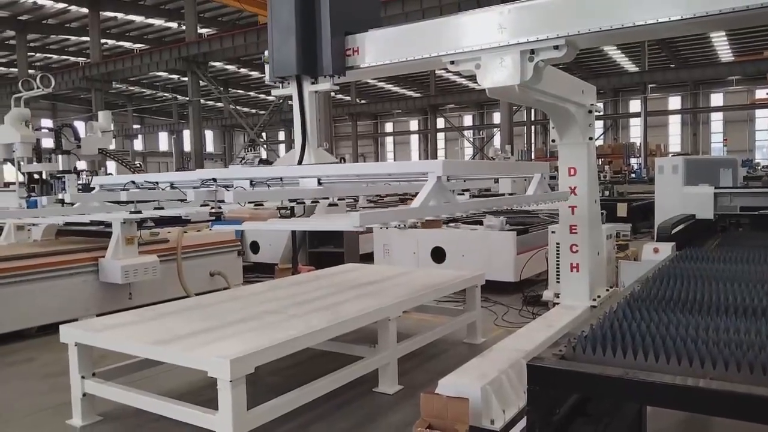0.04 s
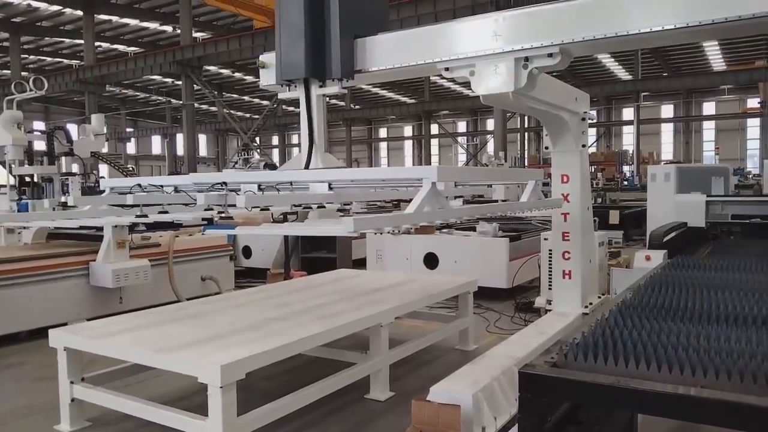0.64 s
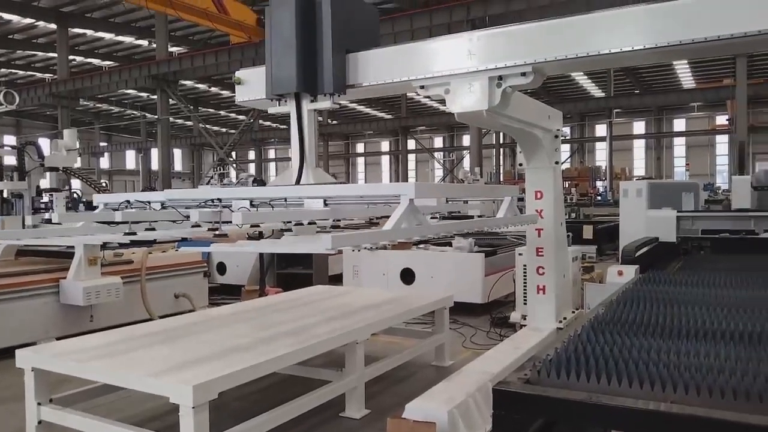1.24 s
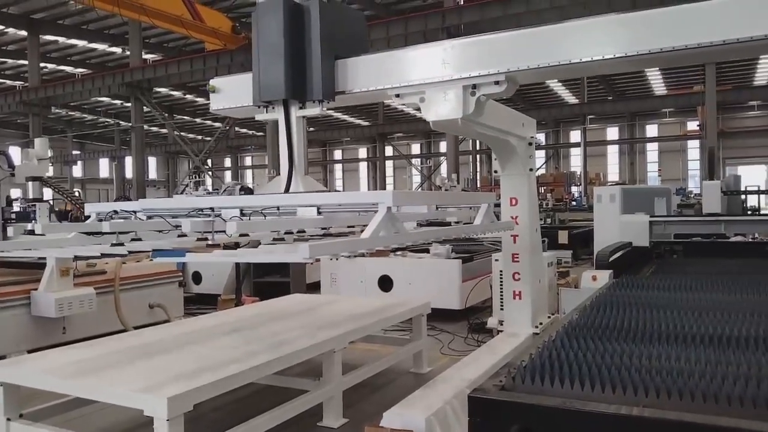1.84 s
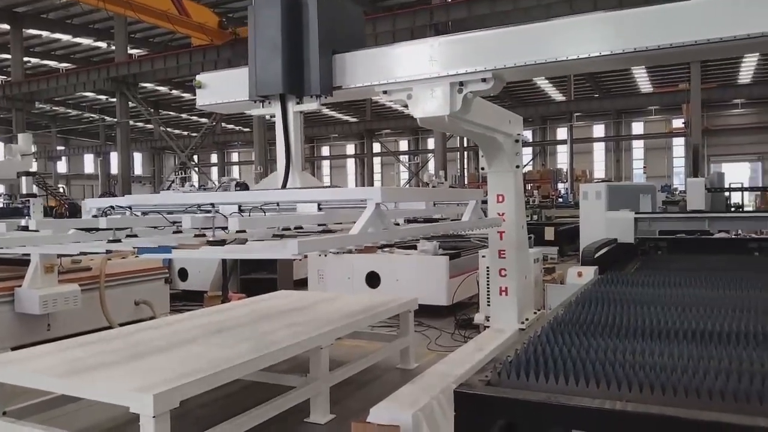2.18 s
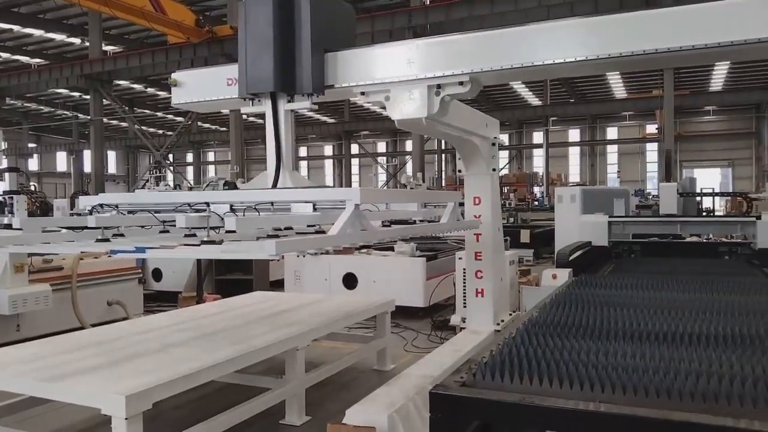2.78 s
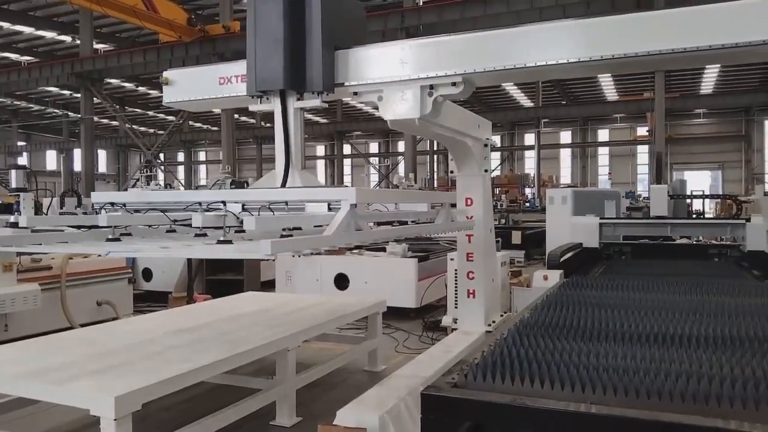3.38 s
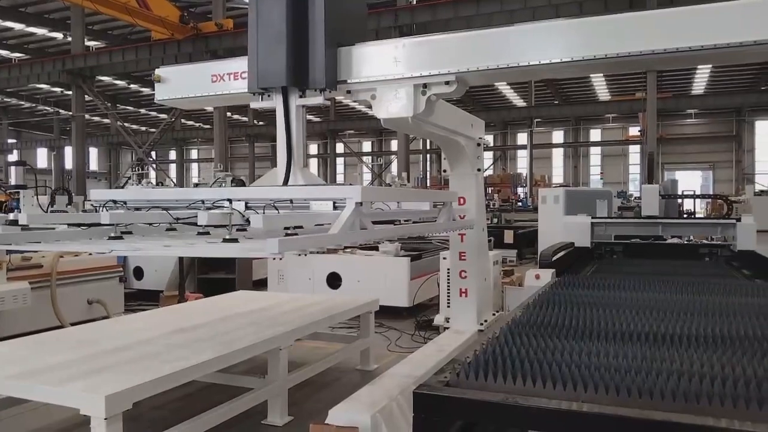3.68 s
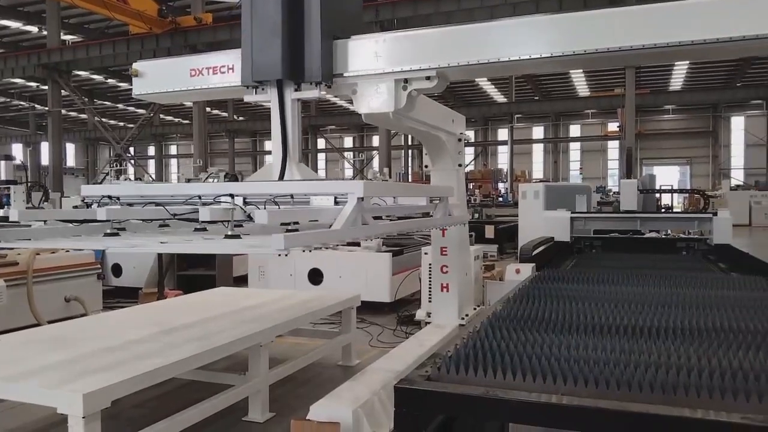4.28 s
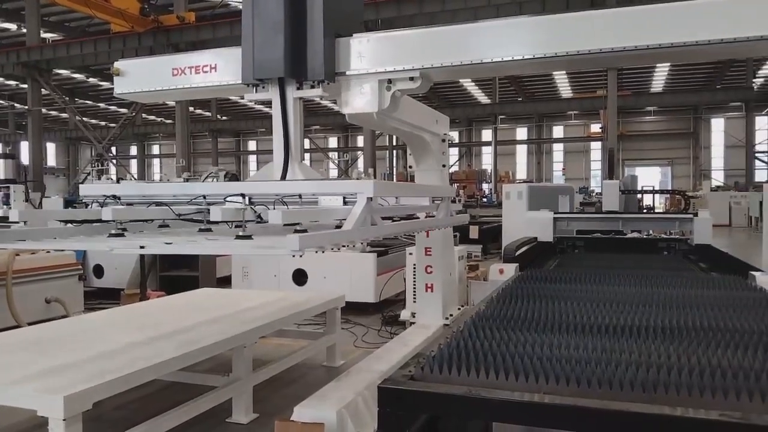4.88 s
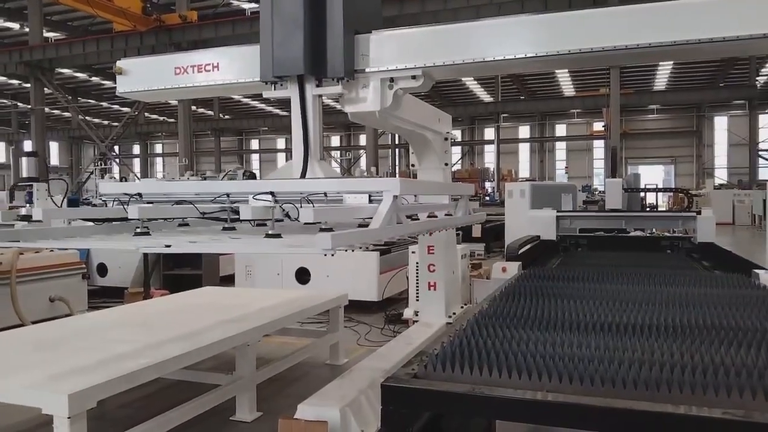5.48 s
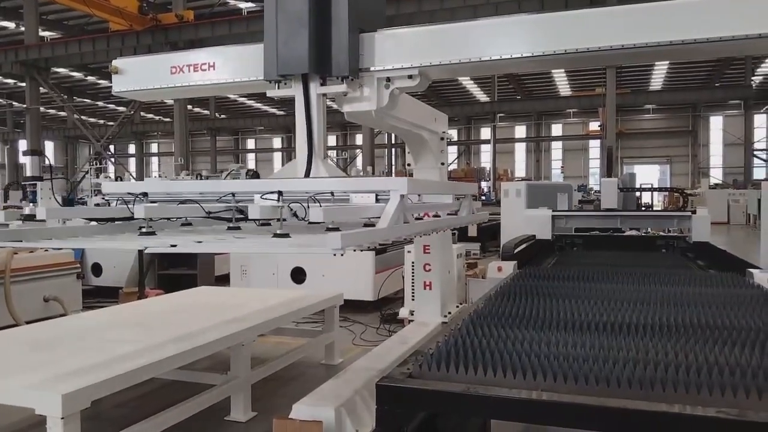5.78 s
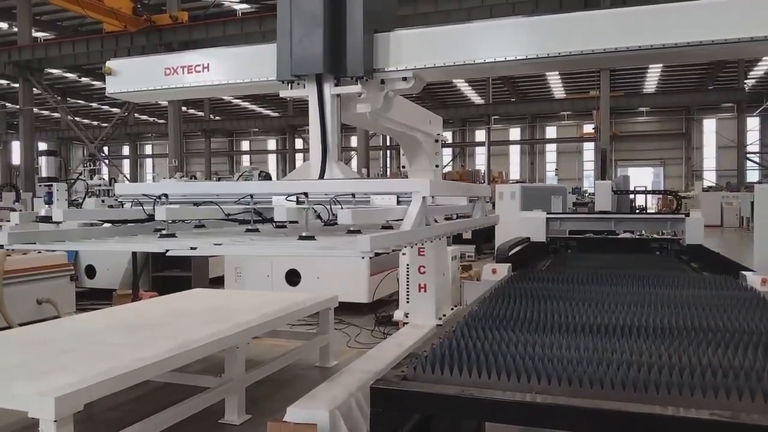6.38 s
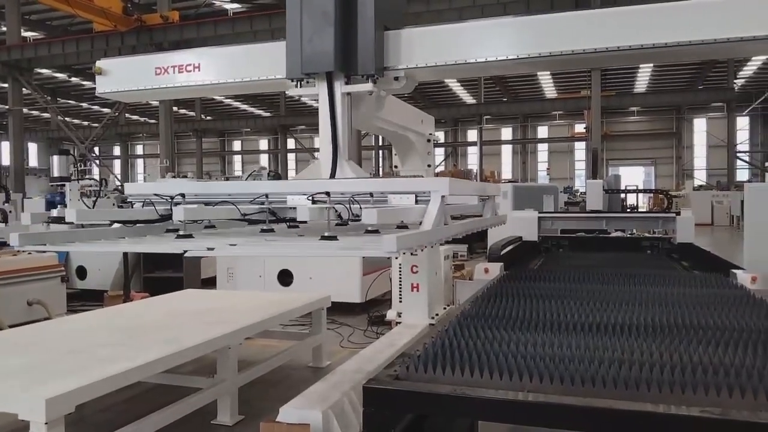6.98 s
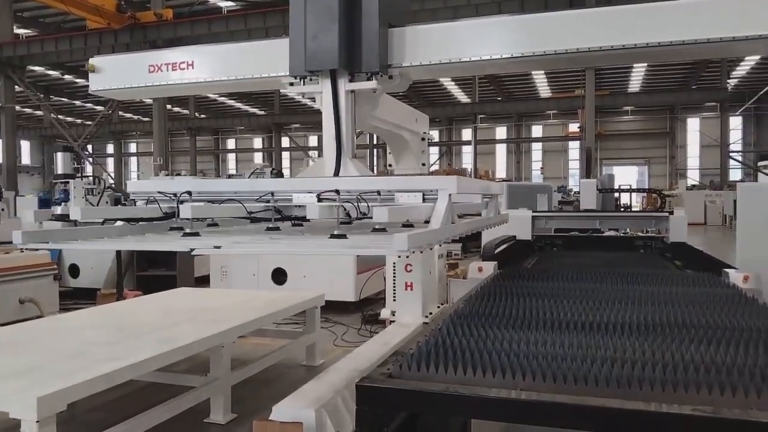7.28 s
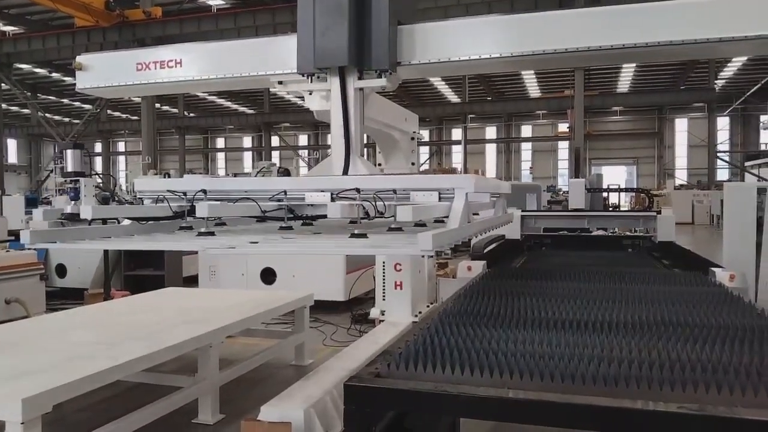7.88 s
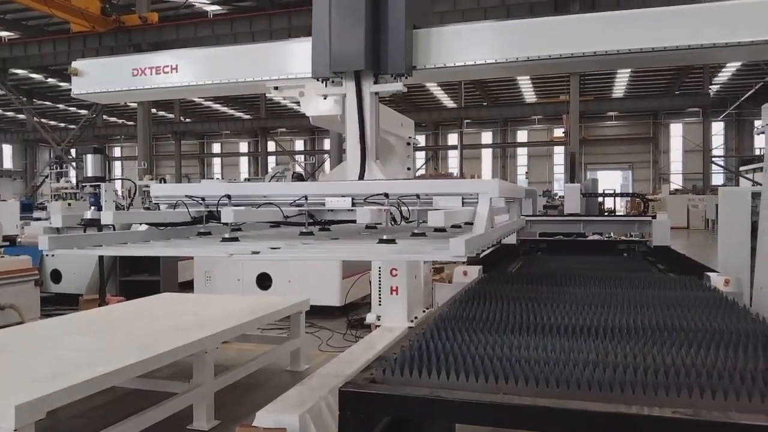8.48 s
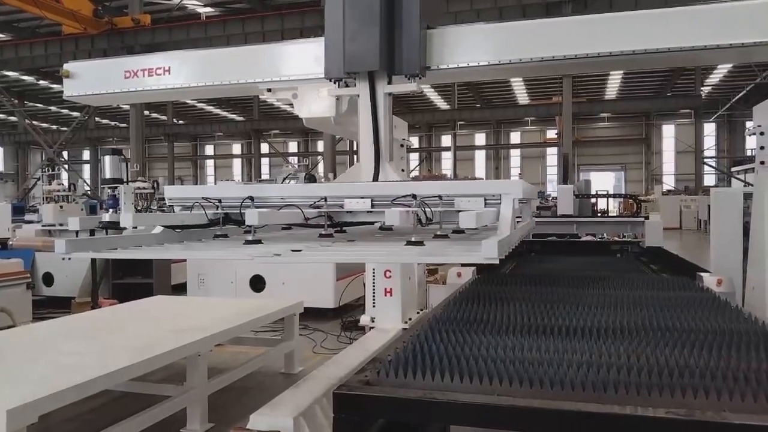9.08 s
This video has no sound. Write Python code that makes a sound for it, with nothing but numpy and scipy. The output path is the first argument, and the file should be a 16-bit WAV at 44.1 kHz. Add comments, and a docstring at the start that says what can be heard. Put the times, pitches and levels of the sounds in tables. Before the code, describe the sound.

A motor whine swells and fades at one pitch in a factory, joined by rasping guides, a sharp metallic bang and air hiss.

```python
"""The drive of a gantry loader whines on the harmonics of one pitch as it crosses a factory hall.
Moving at steady speed through the hall's standing waves, it swells and fades on each harmonic in turn.
Its gears beat and throb, its guides rasp and squeak; below lie mains hum, a pump and far machines.
One loud impact and a few faint ticks ring the metal frame and reverberate in the hall.
A small leak hisses throughout; later, turbulent air rushes through suction cups in spurts."""
import sys
import numpy as np
from scipy import signal
from scipy.fft import rfft, irfft, next_fast_len
from scipy.io import wavfile

SR = 44100
rng = np.random.default_rng(int(sys.argv[2]) if len(sys.argv) > 2 else 0)


def to_wav(sig):
    """Store sig (one row per channel, or 1-D mono) as 16-bit WAV at the path in sys.argv[1].

    Samples outside -1..1 are clipped; the rate is SR.
    """
    pcm = np.clip(np.atleast_2d(sig), -1, 1) * 32767
    pcm = np.round(pcm).astype(np.int16)
    wavfile.write(sys.argv[1], SR, pcm.T)  # frames by channels


N = 403054
T = np.arange(N) / SR


def amp(db):
    """Decibels to amplitude ratio."""
    return 10 ** (np.asarray(db) / 20)


def unit(x):
    """Normalisation to rms 1."""
    return x / np.sqrt(np.mean(abs(x) ** 2) + 1e-20)


def curve(points):
    """Linear interpolation of (time [s], value) at every sample."""
    return np.interp(T, *np.transpose(points))


def read(points, hz):
    """Interpolation of (frequency [Hz], value) on a log-frequency axis."""
    f, value = np.transpose(points)
    return np.interp(np.log(hz + 1), np.log(f + 1), value)


def noise(spectrum):
    """Spectral shaping: white noise filtered to a relative spectrum, at an rms near 1."""
    size = next_fast_len(N + 4096)
    gain = unit(amp(read(spectrum, np.fft.rfftfreq(size, 1 / SR))))
    return irfft(rfft(rng.standard_normal(N), size) * gain, size)[:N]


def drift(cutoff_hz):
    """Random modulation: low-passed noise with an rms near 1."""
    size, rate = 8192, 600
    f = np.fft.rfftfreq(size, 1 / rate)
    slow = irfft(rfft(rng.standard_normal(size)) * (f > 0) / np.sqrt(1 + (f / cutoff_hz) ** 8))
    return np.interp(T, np.arange(size) / rate, unit(slow))


def tone(hz, scatter, waver_hz):
    """Multipath fading: a sine wavers as the share `scatter` of its power comes by shifting reflections."""
    phase = 2 * np.pi * (hz * T + rng.random())
    share = np.clip(scatter, 0, 1)
    steady, scattered = np.sqrt(2 * (1 - share)), np.sqrt(share)
    in_phase = steady + scattered * drift(waver_hz)
    quadrature = scattered * drift(waver_hz)
    return in_phase * np.cos(phase) + quadrature * np.sin(phase)


# passages from node to node: (harmonic number, start [s], end [s], crest level [dB])
NODE_PASSAGES = [(2, -.5, .8, -42.5), (2, .62, 2.13, -47), (2, 2.12, 3.3, -49), (2, 2.35, 4.02, -41.8),
                 (2, 3.92, 6.7, -38), (2, 5.4, 6.68, -45), (2, 6.67, 8.85, -42.2), (2, 8.6, 9.7, -55),
                 (3, -.6, 1.65, -56), (3, 1.55, 3.25, -55.5), (3, 3.3, 6.5, -56), (3, 6.3, 8, -62),
                 (3, 8.1, 9.6, -63), (4, -.17, .47, -46), (4, .15, 1.8, -40.3), (4, 1.8, 2.35, -46.5),
                 (4, 2.1, 3.6, -37.5), (4, 3.1, 5.72, -35.7), (4, 3.55, 5, -35), (4, 5.7, 6.8, -38.7),
                 (4, 6.1, 8.14, -36.4), (4, 8.19, 10, -41.5), (5, .25, 2.1, -57), (5, 2.15, 3.3, -56),
                 (5, 3.33, 4.3, -50.5), (5, 4.3, 5.6, -48.5), (5, 5.7, 6.9, -52), (5, 7.95, 8.7, -52),
                 (5, 8.65, 9.3, -53), (6, -.3, .56, -37.5), (6, .56, 1.2, -45), (6, 1.05, 1.9, -44),
                 (6, 1.85, 2.9, -40), (6, 2.7, 3.65, -40.5), (6, 3.6, 4.44, -44), (6, 4.45, 5.55, -37.7),
                 (6, 5.53, 6.5, -37.3), (6, 6.5, 7.52, -43), (6, 7.48, 8.6, -39.2), (6, 8.52, 8.95, -47),
                 (6, 8.99, 9.6, -46), (7, -.2, .7, -52.5), (7, .9, 2.1, -52.5), (7, 2.1, 3.1, -60),
                 (7, 5.15, 6.1, -53.5), (7, 6.7, 7.5, -58), (7, 7.5, 8.45, -58), (8, -.1, .77, -54.5),
                 (8, .8, 2, -63), (8, 2, 3.45, -55), (8, 3.45, 4.6, -56.5), (8, 4.58, 5.15, -59),
                 (8, 5.1, 5.84, -52), (8, 5.84, 6.52, -50.7), (8, 6.68, 7.45, -55), (8, 7.9, 8.95, -55),
                 (10, -.1, 1.3, -72), (10, 2.42, 3.4, -65.5), (10, 4.1, 5, -69), (10, 5, 6.4, -74),
                 (12, .45, 1.1, -77), (12, 1.1, 1.9, -80), (12, 1.95, 3.25, -78.5), (12, 3.3, 3.85, -75),
                 (12, 3.85, 4.5, -78), (12, 5.15, 5.8, -81)]

def swells(harmonic, arch_power=0.93):
    """Standing waves: a harmonic's amplitude arches between nodes; overlapping arches add in power."""
    power = np.zeros(N)
    for k, start, end, db in NODE_PASSAGES:
        if round(k) == harmonic:
            inside = (T > start) & (T < end)
            arch = abs(np.sin(np.pi * (T[inside] - start) / (end - start))) ** arch_power
            power[inside] += (amp(db) * arch) ** 2
    return np.sqrt(power)


# scattered part of each overtone: (harmonic number, level at closest approach [dB])
DIFFUSE_FIELD = [(2, -69), (3, -67), (4, -61), (5, -62), (6, -57), (7, -64), (8, -68), (10, -80), (12, -93)]
DRIVE_HZ, FUNDAMENTAL_DB = 396.02, -50.5
NEAREST_S, PASS_S = 4.15, 2.74  # closest approach; time to travel a length equal to that distance

def whine():
    """Spherical spreading: the fundamental follows 1/distance; overtones swell over a diffuse field."""
    nearness = 1 / np.hypot(1, (T - NEAREST_S) / PASS_S)
    out = amp(FUNDAMENTAL_DB) * nearness * tone(DRIVE_HZ, scatter=0.016, waver_hz=2.3)
    for harmonic, db in DIFFUSE_FIELD:
        k = round(harmonic)
        diffuse = amp(db + drift(k / 2)) * nearness ** 0.3
        overtone = tone(k * DRIVE_HZ, scatter=0.00064 * k ** 2.13, waver_hz=18.8)
        out += np.hypot(swells(k), diffuse) * overtone
    return out


def standing(crest_s, spacing_s, node_fill=0.25):
    """Amplitude of a partial standing wave crossed at steady speed, one node every spacing_s."""
    return np.hypot(np.cos(np.pi * (T - crest_s) / spacing_s), node_fill)


# mesh tones around harmonic 6: (frequency [Hz], relative crest level [dB], time of one crest [s])
SIDEBANDS = [(2290, -56.5, 0.52), (2330, -53, .05), (2345, -53, 0.24), (2350.5, -55, .35),
             (2345, -51, 0.37), (2341, -54, 0.68), (2384, -55.5, 0.15), (2380, -57, 0.63)]
# their common envelope: (time [s], gain [dB])
SIDEBAND_GAIN = [(0, 0), (.8, 3.5), (1.4, -0.5), (2.3, 0.5), (3.3, 1.5), (4.25, 2.5), (5, -0.5), (6.3, -2),
                 (7.2, -2.5), (8.4, -2), (9, 0)]
# faint gear overtones: (frequency [Hz], crest level [dB])
GEAR_OVERTONES = [(1423.9, -60.5), (1442.1, -67.5), (3564.3, -75), (4011.9, -85.5), (7128.3, -81.5),
                  (8000.3, -83.5)]
NODE_S = 1  # time from node to node at harmonic 6

def gear_mesh():
    """Beating: close sidebands interfere into a chatter; shorter wavelengths bring nodes more often."""
    sidebands = sum(amp(db) * standing(crest_s, NODE_S) * tone(hz, scatter=0.14, waver_hz=4)
                    for hz, db, crest_s in SIDEBANDS)
    out = amp(curve(SIDEBAND_GAIN)) * sidebands
    for hz, db in GEAR_OVERTONES:
        swell = standing(rng.random(), NODE_S * 6 * DRIVE_HZ / hz)
        out += amp(db) * swell * tone(hz, scatter=0.43, waver_hz=hz / 250)
    return out


# envelope of the pinion's tone: (time [s], crest level [dB])
PINION_LEVEL = [(0, -66), (.85, -51.5), (2.7, -41), (9.14, -40)]

def pinion(hz=2005.9, turn_s=0.893, crest_s=4.48, depth=0.57):
    """Amplitude modulation: a slightly eccentric pinion makes its tone throb once a turn."""
    throb = 1 - depth + depth * np.cos(2 * np.pi * (T - crest_s) / turn_s)
    return amp(curve(PINION_LEVEL)) * throb * tone(hz, scatter=0.055, waver_hz=13)


# rolling noise of rack and guides: (frequency [Hz], relative spectral density [dB])
RASP_SPECTRUM = [(600, -32.5), (1000, -24.5), (1400, -10), (1800, -9.5), (2080, -2.5), (2350, -0.1),
                 (2500, -0.5), (2750, -7.5), (3200, -14.5), (4000, -25), (4400, -38), (5050, -41.5),
                 (5600, -85)]
# how hard the guides rub: (time [s], level [dB])
RUB_LEVEL = [(0, -44), (2.7, -44.5), (3.25, -42.5), (3.75, -45.5), (4.7, -47), (5.3, -44), (5.72, -47),
             (6.05, -44), (9.14, -43.4)]

def rasp(surge_db=9.5, settle_s=0.086):
    """Resonance: the rail colours rolling noise, which starts hard and chatters as the teeth engage."""
    chatter_db = 1.3 * drift(35) + 0.22 * drift(2.7)
    onset_db = surge_db * np.exp(-T / settle_s)
    return amp(curve(RUB_LEVEL) + onset_db + chatter_db) * noise(RASP_SPECTRUM)


# mains hum and shaft orders of a pump: (frequency [Hz], relative level [dB])
HUM_LINES = [(66.6, -79), (99.8, -69), (152.1, -63.5), (173.6, -66.5), (217.4, -66.5), (238.9, -61.5),
             (261.1, -65.5), (264.5, -60), (282, -67), (300.1, -72), (399.7, -69), (1399.7, -68.5)]
# dull roar of the hall: (frequency [Hz], relative spectral density [dB])
ROAR_SPECTRUM = [(10, -44), (25, -37.5), (45, -29), (70, -18.5), (100, -1.5), (130, -3), (170, -2.5),
                 (260, 3.5), (340, -3.5), (450, -4), (580, -9), (1000, -9), (1500, -6), (2500, -10),
                 (4000, -37), (5500, -71)]
# slow swell of hum and roar: (time [s], gain [dB])
HALL_GAIN = [(0.0, 1.8), (1.6, 2.5), (2.72, 4), (3.8, 1.5), (5.76, 1.1), (8.08, 1), (8.68, -1), (9.13, 1.5)]
# drone of a far motor: (time [s], level [dB])
DRONE_LEVEL = [(0, -73), (1.5, -68), (2.5, -58.5), (4, -58.5), (6, -64.5), (6.5, -75.5), (7.6, -58.5),
               (8.5, -60), (9.14, -58.5)]
# hollow midrange rush: (frequency [Hz], relative spectral density [dB])
RUSH_SPECTRUM = [(300, -23), (480, 2.5), (750, 16), (1100, 2.5), (1500, -37)]
# its envelope: (time [s], level [dB])
RUSH_ENVELOPE = [(0, -59), (1.8, -61), (3.4, -62), (4.2, -75.5), (6.5, -71), (9.14, -61.5)]

def hall(drone_hz=130.2):
    """Superposition: far machines add up to a hum, a dull roar, a drone and a hollow rush."""
    hum = amp(-3) * sum(amp(db) * tone(hz, scatter=0.4, waver_hz=0.9) for hz, db in HUM_LINES)
    roar = amp(-50 + 0.69 * drift(3.3)) * noise(ROAR_SPECTRUM)
    drone = amp(curve(DRONE_LEVEL)) * tone(drone_hz, scatter=0.14, waver_hz=1.8)
    rush = amp(curve(RUSH_ENVELOPE)) * noise(RUSH_SPECTRUM)
    return amp(curve(HALL_GAIN)) * (hum + roar) + drone + rush


# passing notes of far machines: (time of crest [s], duration [s], frequency [Hz], crest level [dB])
MACHINE_NOTES = [(.16, 0.47, 620, -59.5), (0.847, 0.93, 644, -63), (1.4, 0.76, 178.7, -53.5),
                 (1.453, 2.4, 300, -56), (1.95, 1.3, 645, -60.5), (5.654, 0.2, 990, -54),
                 (6.48, .2, 604, -57)]

def far_notes():
    """Multipath fading: notes of far machines waver as they swell and die away."""
    out = np.zeros(N)
    for crest_s, duration_s, hz, db in MACHINE_NOTES:
        swell = np.cos(np.pi * np.clip((T - crest_s) / duration_s, -0.5, 0.5))
        out += amp(db) * swell * tone(hz, scatter=0.089, waver_hz=9)
    return out


# a small air leak: (frequency [Hz], relative spectral density [dB])
LEAK_SPECTRUM = [(5800, -60), (6400, -1), (6800, 6.5), (7200, 10.5), (7700, 4.5), (8300, 0), (8800, -36.5),
                 (9500, -47)]

def leak():
    """Jet noise: steadily escaping air gives a thin, high hiss."""
    return amp(-63.5 + 0.5 * drift(11)) * noise(LEAK_SPECTRUM)


# spurts of suction: (valve opens [s], valve shuts [s], level at full flow [dB])
VALVE_SPURTS = [(-.3, 0.01, -62), (3.223, 3.395, -58.5), (5.9, 7.06, -55.5), (7.22, 7.98, -56),
                (8.25, 9.3, -53)]
# air in the suction cups: (frequency [Hz], relative spectral density [dB])
HISS_SPECTRUM = [(2500, -6.5), (3800, -1.5), (4500, -2), (5000, 1), (5600, -6.5), (6400, 1.5), (7150, 4.5),
                 (7800, -0.5), (8700, -4.5), (9300, -21.5), (9900, -39.5), (11300, -51)]
# sizzle of the jet: (frequency [Hz], relative spectral density [dB])
SIZZLE_SPECTRUM = [(7000, -32), (8800, 5), (9400, -3), (10000, -15.5), (10700, -6), (11400, -8),
                   (11900, -28)]

def suction(rise_s=0.089, fall_s=0.17, seep_db=-94.5, sizzle_db=-76.5, sizzle_power=8):
    """Turbulence: a fluttering hiss follows the flow, and a sizzle grows as a steep power of it."""
    flow = amp(seep_db)
    for opens, shuts, db in VALVE_SPURTS:
        build_up = (1 - np.exp(-np.maximum(T - opens, 0) / rise_s)) ** 2
        decay = np.exp(-np.maximum(T - shuts, 0) / fall_s)
        flow = flow + amp(db) * build_up * decay
    hiss = unit(sum(amp(0.9 * drift(20)) * noise(HISS_SPECTRUM) for _ in range(2)))
    sizzle = amp(sizzle_db + 2.4 * drift(14)) * noise(SIZZLE_SPECTRUM)
    return flow * hiss + (flow / flow.max()) ** sizzle_power * sizzle


def click(spectrum, size=2048):
    """Minimum-phase impulse response of a body with the given spectrum, with peak 1."""
    log_gain = np.log(amp(read(spectrum, np.fft.rfftfreq(size, 1 / SR))))
    cepstrum = irfft(log_gain)
    response = irfft(np.exp(rfft(2 * cepstrum[:size // 2], size)))
    return response / abs(response).max()


# metal knocks and ticks: (time [s], impulse level [dB], contact bandwidth [Hz])
IMPACTS = [(.79, -47, 8000), (3.263, -42, 8000), (3.3482, -20.5, 6500), (3.3499, -18.5, 16000),
           (3.3513, -21.5, 7000), (3.3528, -17.5, 8000), (3.356, -28, 16000), (3.3589, -19.5, 6000),
           (3.3658, -27, 8000), (3.377, -32, 8000), (3.398, -31, 10000), (5.878, -48, 8000)]
# broad response of the struck frame: (frequency [Hz], relative spectral density [dB])
FRAME_SPECTRUM = [(50, -38), (150, -17), (300, 0.5), (450, -15.5), (680, -15.5), (860, 0.5), (1100, -12),
                  (1300, -12), (1700, -5), (2150, 5.5), (2700, -1.5), (3300, -7.5), (4500, -21),
                  (5100, -20.5), (5600, -39), (7200, -9), (9000, -27), (10000, -47), (10700, -41),
                  (11800, -54.5)]
# its clearest modes: (frequency [Hz], relative level [dB], 60 dB decay time [s])
MODES = [(840, -31.5, 0.066), (1650, -31.5, 0.12), (1830, -32, .2), (2003, -20.5, .11), (2094, -26, .15),
         (2294, -28, .22), (2490, -24, .3), (2660, -28.5, 0.14), (2830, -30, 0.08), (5001, -46, .35)]

def knocks(rattle_s=0.025, rattle_db=-24, room_db=-6):
    """Impact excitation: each contact cracks, duller if softer, rings the frame's modes and rattles."""
    t = np.arange(SR // 2) / SR
    force, rattle_power = np.zeros(N), np.zeros(N)
    for start_s, db, bandwidth_hz in IMPACTS:
        at = round(start_s * SR)
        pulse = np.exp(-(np.pi * bandwidth_hz * (t[:20] - t[10])) ** 2)
        force[at:at + len(pulse)] += amp(db) * pulse / pulse.sum()
        rattle_power[at:at + len(t)] += (amp(db) * np.exp(-t / rattle_s)) ** 2
    modes = sum(amp(db - 60 * t / t60) * np.sin(2 * np.pi * hz * t) for hz, db, t60 in MODES)
    crack = signal.oaconvolve(force, click(FRAME_SPECTRUM))[:N]
    ring = signal.oaconvolve(force, modes)[:N]
    rattle = amp(rattle_db) * np.sqrt(rattle_power) * noise(FRAME_SPECTRUM)
    direct = crack + ring + rattle
    return direct + amp(room_db) * reverberate(direct)


# reverberation of the hall: (frequency [Hz], 60 dB decay time [s])
REVERB_TIMES = [(200, 1.8), (800, 0.88), (2000, 0.59), (4000, 0.58), (7500, 0.6), (10000, 0.2)]

def reverberate(x):
    """Reverberation: dense reflections decay exponentially, each band at its own rate."""
    hz, t, bands = signal.stft(rng.standard_normal(SR), SR, nperseg=256)
    decay = amp(-60 * t / read(REVERB_TIMES, hz)[:, None])
    _, tail = signal.istft(bands * decay, SR, nperseg=256)
    return signal.fftconvolve(x, tail / np.linalg.norm(tail))[:N]


# squeaks of a guide roller: (start [s], frequency [Hz], level [dB], level of the octave [dB])
ROLLER_SQUEAKS = [(2.17, 2490, -52, -66.5), (2.95, 2480, -45.5, -64.5), (4.06, 2510, -44.5, -68.5)]

def squeaks(rise_s=0.018, fall_s=0.15, octave_fall_s=0.075):
    """Stick-slip friction: a roller catches and sings roughly, with a harsh octave that dies sooner."""
    out = np.zeros(N)
    for start, hz, db, octave_db in ROLLER_SQUEAKS:
        rise = np.clip((T - start) / rise_s, 0, 1)
        since_peak = np.maximum(T - start - rise_s, 0)
        note = amp(db) * np.exp(-since_peak / fall_s) * tone(hz, scatter=0.76, waver_hz=31)
        octave = np.exp(-since_peak / octave_fall_s) * tone(2 * hz, scatter=0.85, waver_hz=85)
        out += rise * (note + amp(octave_db) * octave)
    return out


def scene():
    """Superposition: the pressures of all sources add at one point."""
    gantry = whine() + gear_mesh() + pinion() + rasp()
    return (gantry + hall() + far_notes() + leak() + suction() + knocks() + squeaks())[None]


def record(dry, cutoff_hz=11900):
    """Band limiting: a steep low-pass filter removes the highest treble."""
    lowpass = signal.firwin(511, cutoff_hz, window=("kaiser", 9), fs=SR)
    return signal.oaconvolve(dry, lowpass[None], "same")


dry = scene()
out = record(dry)
to_wav(out)
```